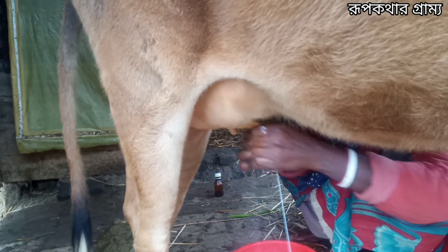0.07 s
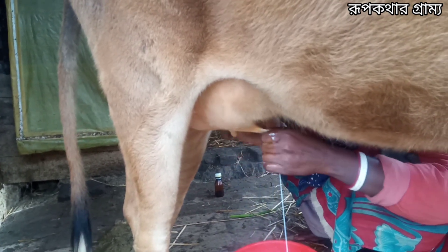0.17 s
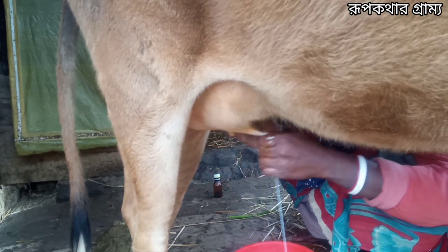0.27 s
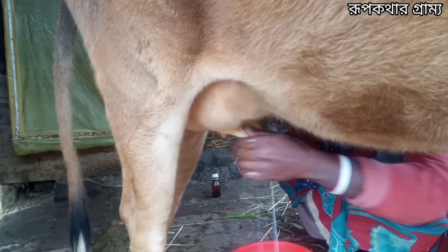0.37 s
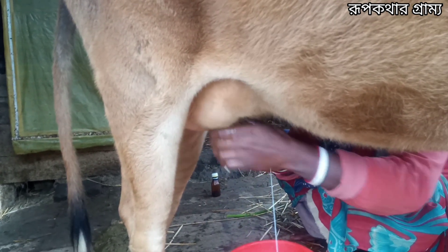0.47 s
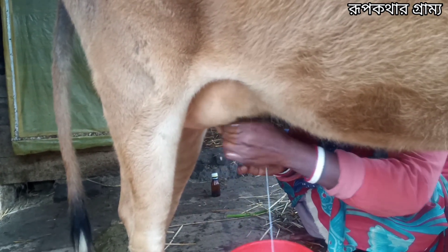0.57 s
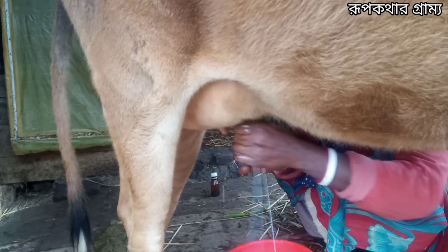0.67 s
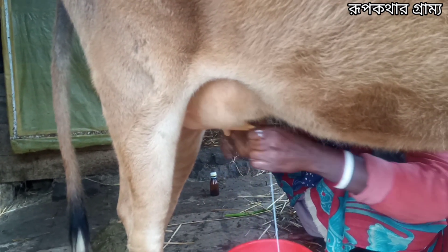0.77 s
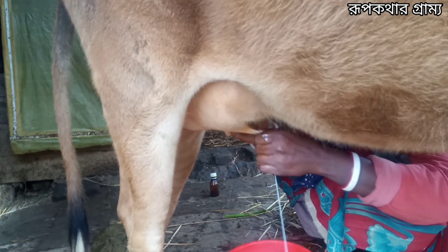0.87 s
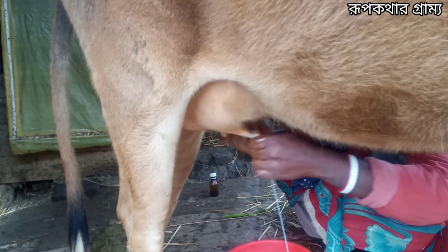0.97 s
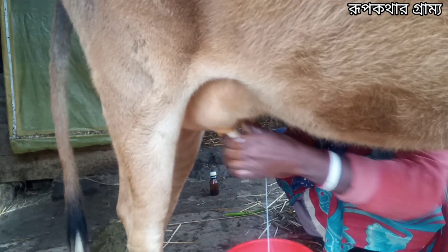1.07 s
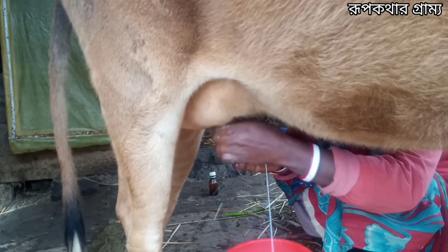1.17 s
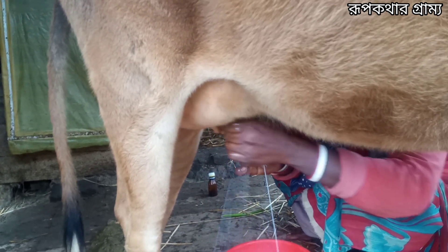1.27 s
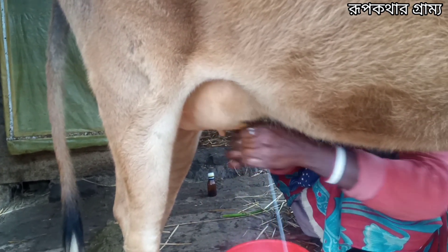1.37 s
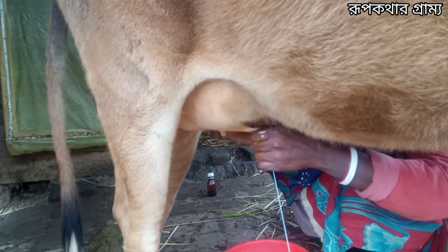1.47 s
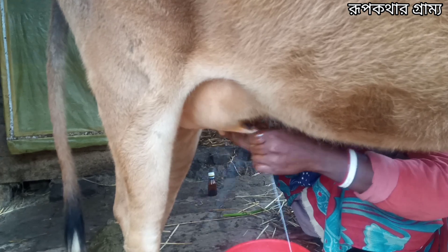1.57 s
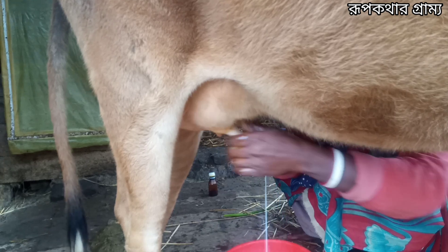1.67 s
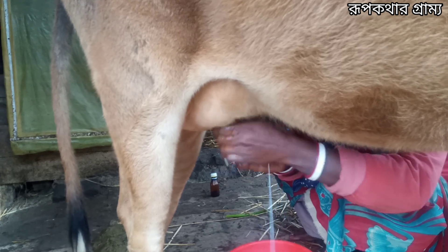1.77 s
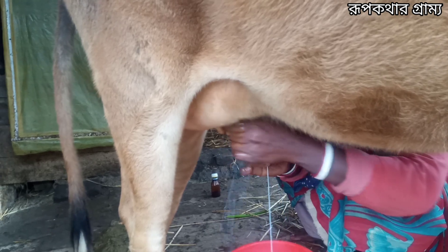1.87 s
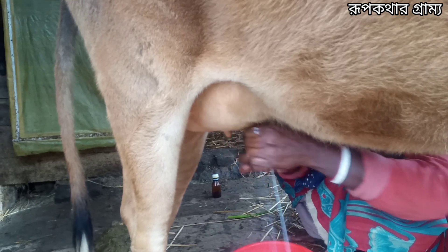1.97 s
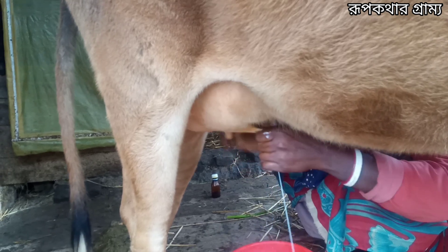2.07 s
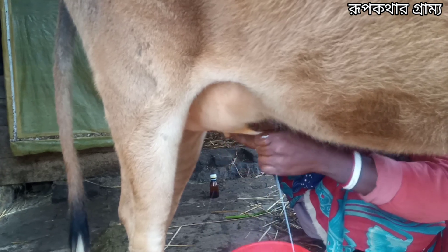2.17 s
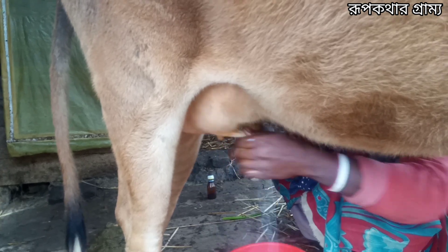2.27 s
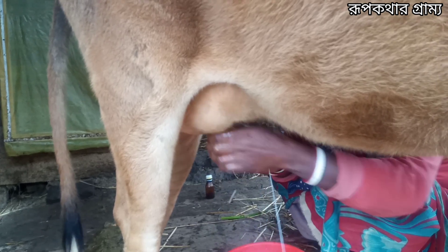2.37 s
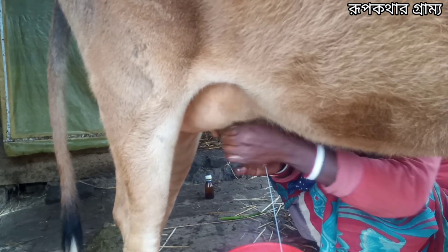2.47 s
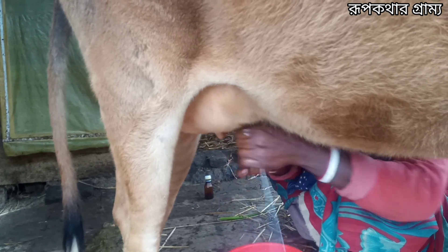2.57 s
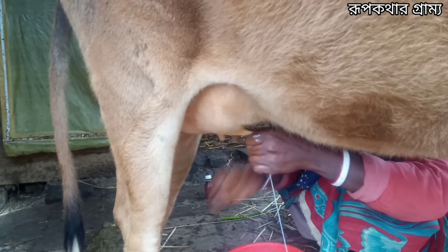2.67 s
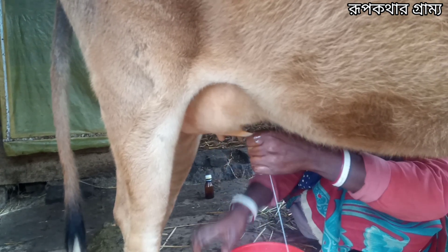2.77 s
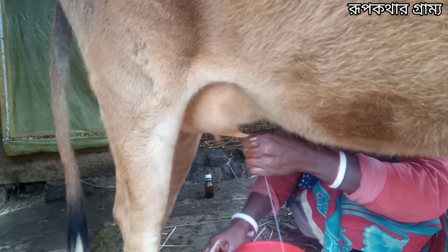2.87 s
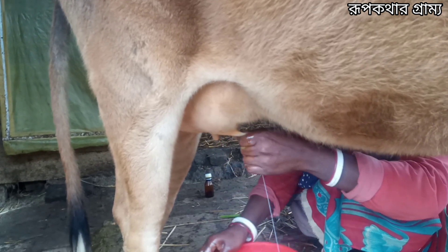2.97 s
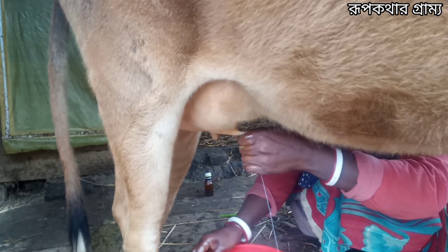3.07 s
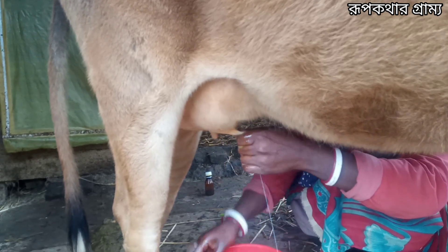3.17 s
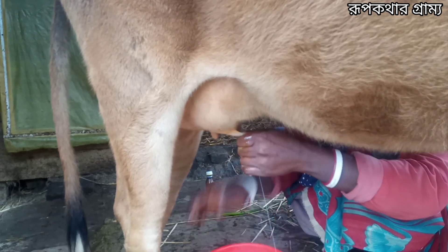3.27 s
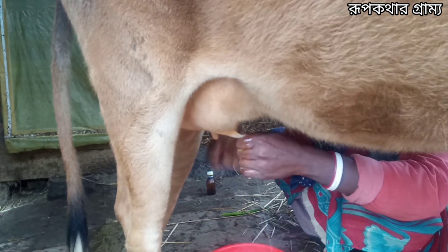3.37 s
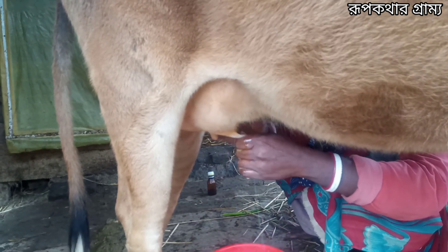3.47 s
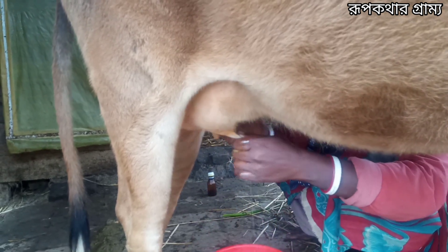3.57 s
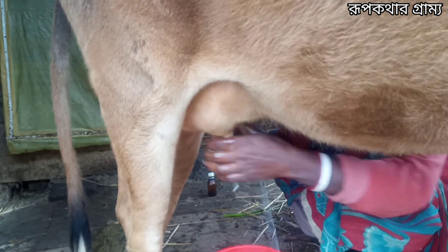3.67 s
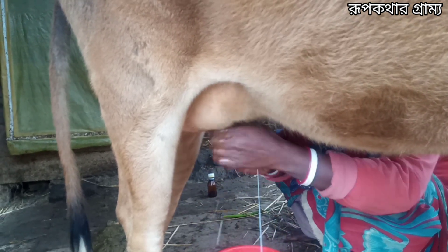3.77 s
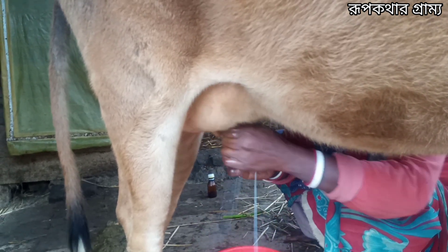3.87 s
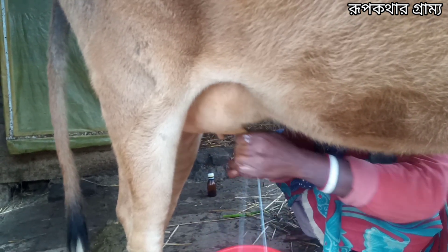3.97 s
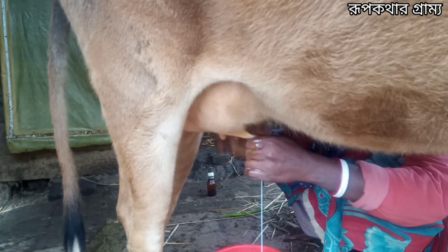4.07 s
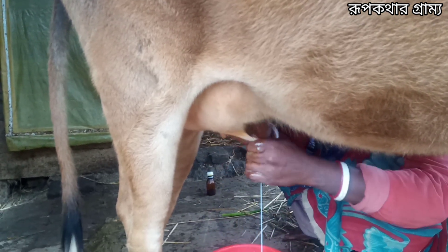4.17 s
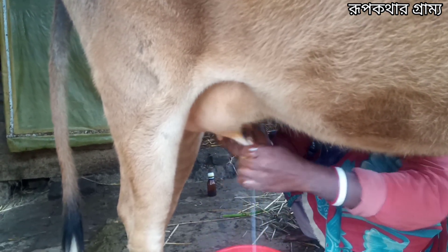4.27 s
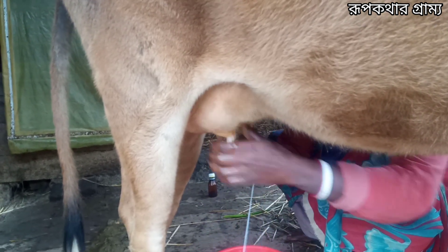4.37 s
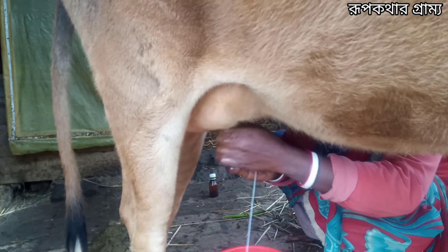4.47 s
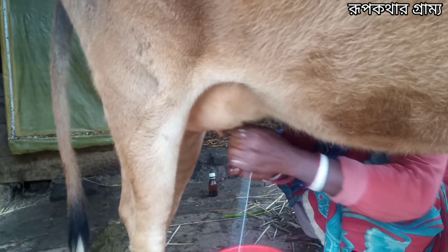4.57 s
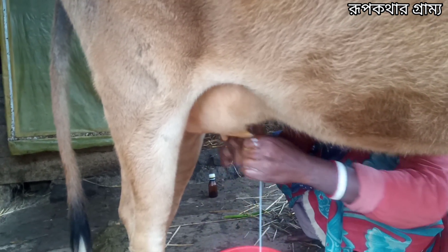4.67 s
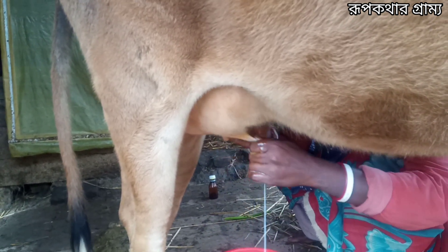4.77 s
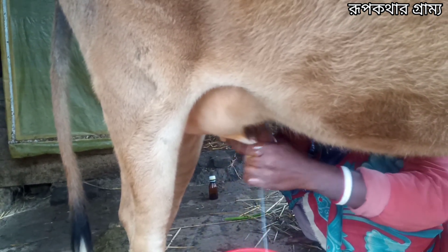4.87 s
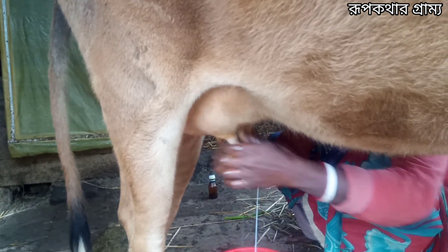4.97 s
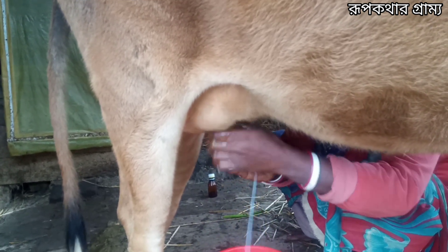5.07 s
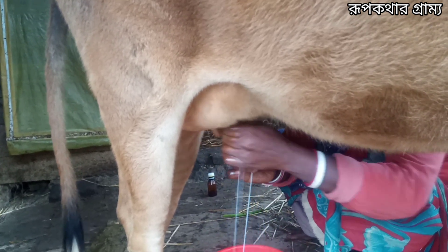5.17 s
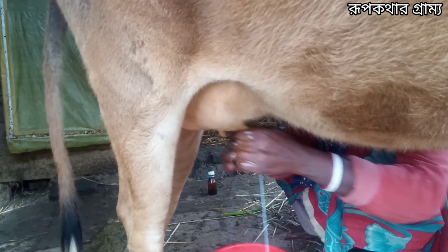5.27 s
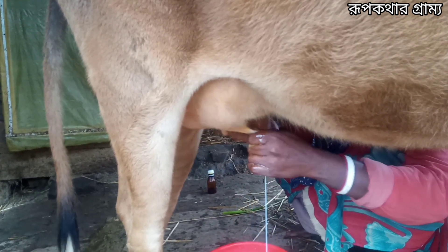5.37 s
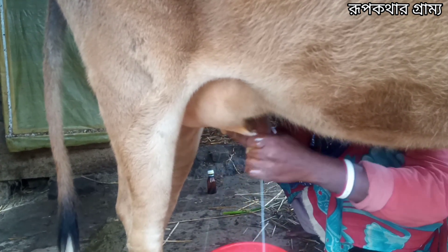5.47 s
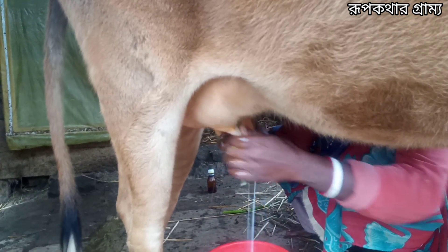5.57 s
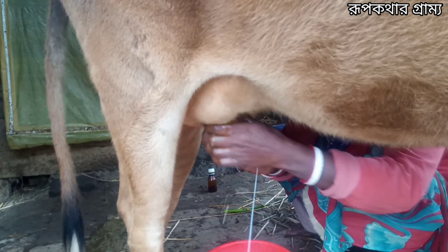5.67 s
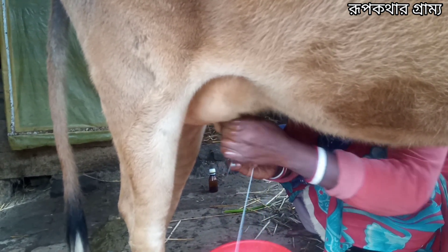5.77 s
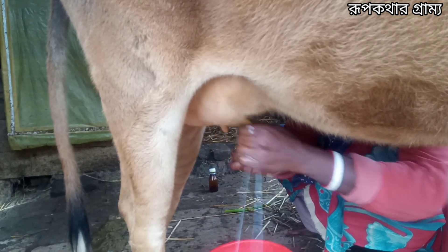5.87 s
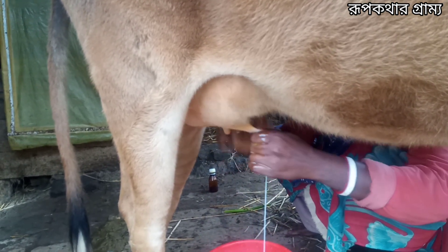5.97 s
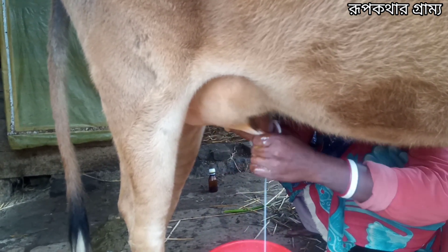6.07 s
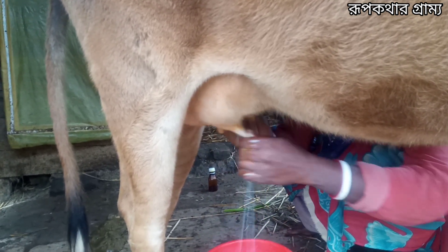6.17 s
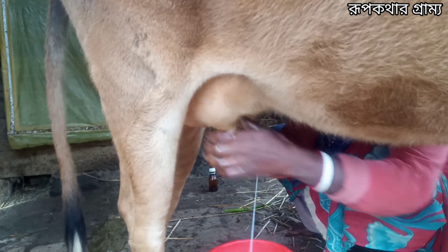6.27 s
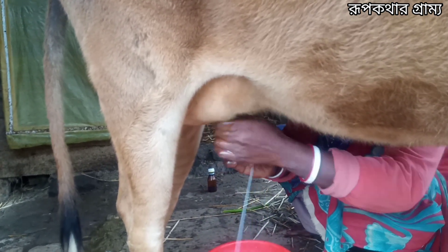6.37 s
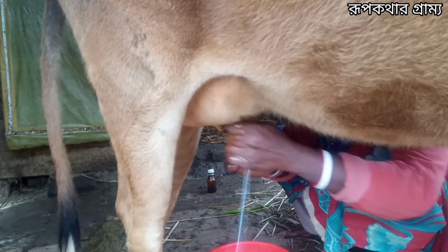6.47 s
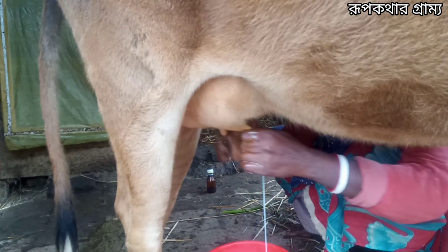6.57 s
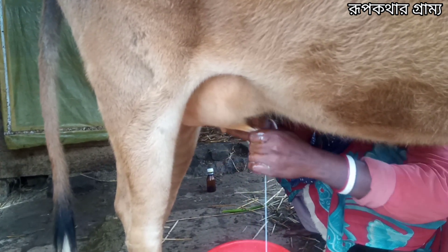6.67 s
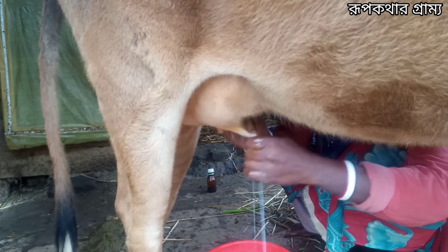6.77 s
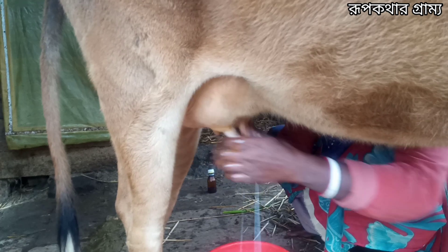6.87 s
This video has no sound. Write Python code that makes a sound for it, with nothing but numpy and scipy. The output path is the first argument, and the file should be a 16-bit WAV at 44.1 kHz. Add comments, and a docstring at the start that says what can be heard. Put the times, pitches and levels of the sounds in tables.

```python
"""Fizzing squirts of milk in a steady two-handed rhythm: a cow is milked outdoors into a plastic bucket.
Each jet tears the froth, drives bubbles under it and throws spray, and the bucket rings along.
Halfway, one hand shifts the bucket, which knocks twice; a few drops tick over a thin hiss
before the milking goes on. A soft scuff passes near the end, and a quiet yard lies underneath."""
import sys
import numpy as np
from scipy import signal
from scipy.fft import rfft, irfft, next_fast_len
from scipy.io import wavfile
from scipy.ndimage import uniform_filter1d, map_coordinates

SR = 44100
rng = np.random.default_rng(int(sys.argv[2]) if len(sys.argv) > 2 else 0)


def pcm_store(signal):
    """Save signal as 16-bit PCM."""
    levels = np.round(np.clip(np.atleast_2d(signal), -1, 1) * 32767)
    wavfile.write(sys.argv[1], SR, levels.astype(np.int16).T)


N = 305172

# One row a squeeze: (start [s], swell [s], length [s], hold [1 fades evenly, more holds longer],
# fizz [dB], plunge over fizz [dB], spray over fizz [dB], extra mist [dB], churn [dB],
# nominal crater pitch [Hz], plunge pitch [Hz])
SQUEEZES = [(-0.019, 0.0066, 0.18, 1.04, -26, 1, -31, 5, -42.5, 2500, 1200),
            (0.103, 0.074, 0.29, 2.97, -25.5, 1.0, -10.5, 3.5, -44.5, 2390, 1140),
            (0.453, 0.011, 0.305, 3.15, -23, -6.5, -15, 2, -40.5, 2600, 1400),
            (0.769, 0.054, 0.26, 2.33, -21.0, -1.0, -11.5, 0.0, -39.5, 2900, 1200),
            (1.105, 0.016, 0.26, 2.37, -19.5, -4.5, -15.5, 2, -39, 2660, 1230),
            (1.397, 0.097, 0.23, 4.6, -23, -5.5, -5.5, -1.5, -68, 2320, 1100),
            (1.745, 0.0036, 0.3, 1.9, -21, -4.5, -15, -0.5, -41.5, 2360, 1080),
            (2.03, 0.074, 0.23, 3.6, -24, -6.5, -8.0, 0.5, -71, 2980, 1050),
            (2.374, 0.0054, 0.24, 3.05, -27.5, 0, -9.5, 2, -44, 3040, 1140),
            (2.643, 0.021, 0.048, 4.1, -31, -3.0, -16, 6.5, -37.5, 3530, 1180),
            (2.733, 0.06, 0.15, 3.9, -30.5, -10, -12.5, -3, -50, 2100, 1350),
            (2.975, 0.005, 0.18, 2.6, -39, -10, -1, -2, -52.5, 2580, 1060),
            (3.777, 0.0042, 0.23, 9.5, -34.0, -0.5, -9.5, 2.0, -49, 2530, 1230),
            (4.03, 0.05, 0.31, 2.75, -27.0, -0.5, -12.5, -7, -41, 2910, 1250),
            (4.421, 0.054, 0.19, 2.23, -17, -9, -12, 3, -48, 3080, 1260),
            (4.701, 0.087, 0.22, 2.5, -18, -5.5, -15.5, -0.5, -45, 2630, 1260),
            (5.022, 0.016, 0.22, 1.5, -15.5, -6, -19.5, 6, -42.5, 2400, 1340),
            (5.313, 0.043, 0.26, 3.06, -25.5, -0.5, -8.0, -2, -41.5, 2260, 1210),
            (5.646, 0.21, 0.19, 4.5, -11.5, -9, -20, 3, -35, 2670, 1230),
            (5.976, 0.044, 0.23, 2.4, -19, -5, -22, -4, -46, 2530, 1240),
            (6.306, 0.011, 0.16, 5.8, -21, -9.5, -15, 4.5, -46.5, 2650, 1240),
            (6.596, 0.026, 0.26, 2.4, -21.5, -3.5, -13, -1.0, -44, 2900, 1200),
            (6.9, 0.016, 0.224, 2.6, -29.5, -0.5, -10.0, -6, -57, 3240, 1330)]
ATTACK_S = 0.0055  # how fast a jet lands


def milk():
    """The jet tears the foam, plunges under it and throws spray, sputtering as it breaks into beads."""
    *_, fizz_db, plunge_db, spray_db, mist_db, churn_db, crater_hz, plunge_hz = np.transpose(SQUEEZES)
    turn, progress = turns()
    sputter, surge = wander(per_s=150), wander(per_s=30)
    fizz_env = squeezing(fizz_db, follow=0.98, lead_s=0, dribble_db=-1.5)
    plunge_env = squeezing(fizz_db + plunge_db, follow=0.99, lead_s=0, dribble_db=-5)
    spray_env = squeezing(fizz_db + spray_db, follow=0.81, lead_s=0.015, dribble_db=-7)
    churn_env = squeezing(churn_db, follow=0.16, lead_s=0.022, dribble_db=-26)
    sag = 1.06 - 0.058 * progress  # the crater's pitch sinks as the jet weakens
    fizz = fizzing(fizz_env + 0.89 * sputter + 0.48 * surge, crater_hz[turn] * sag)
    plunge = plunging(plunge_env + 0.48 * sputter + 0.88 * surge, plunge_hz[turn])
    spray = spraying(spray_env + 1.64 * sputter + 2.4 * surge, mist_db[turn])
    return fizz + plunge + spray + churning(churn_env)


def turns():
    """Which squeeze is under way at each moment, and how far it has got (0-1)."""
    t = np.arange(N) / SR
    start, _, length, *_ = np.transpose(SQUEEZES)
    turn = np.searchsorted(start[1:] - ATTACK_S, t)
    return turn, np.clip((t - start[turn]) / length[turn], 0, 1)


def squeezing(levels_db, follow, lead_s, dribble_db, swell_db=12.5):
    """A jet layer's envelope in dB: it swells as the fist closes and follows the teat's emptying."""
    # Milk dribbling between squeezes, except while the bucket is shifted: (time [s], level [dB])
    dribble = [(0, -54), (1.1, -43), (1.7, -45.5), (2.7, -48.5), (3.1, -55.5), (3.2, -88), (3.75, -96),
               (3.8, -41.5), (5.3, -45.5), (5.9, -46), (6.9, -41.5)]
    t = np.arange(0, N, 32) / SR
    power = amp(np.interp(t, *np.transpose(dribble)) + dribble_db) ** 2
    for (start, swell, length, hold, *_), db in zip(SQUEEZES, levels_db):
        since = t - start + lead_s
        attack = np.exp(np.minimum(since, 0) / ATTACK_S)
        age = np.maximum(since, 0)
        emptied_db = follow * 21 * np.minimum(age / length, 6) ** hold
        power += (attack * amp(db - swell_db * np.exp(-age / swell) - emptied_db)) ** 2
    return np.interp(np.arange(N) / SR, t, 10 * np.log10(power))


def fizzing(level_db, crater_hz):
    """Small bubbles and droplets where the jet tears the foam; its crater resonates as it changes size."""
    # Tone of the torn foam: (frequency [Hz], level [dB])
    foam_eq = [(900, -27), (1500, -8), (2000, -4), (3200, 0), (3900, -1), (4600, -8), (5600, -11.5),
               (7200, -5.5), (8500, -17.5), (11000, -19.5)]
    foam = bubbles(1415, 9497, cycles=22.2, spread_db=3.5, rise=0.01, count=20000, size=500)
    foam += amp(-0.5) * splatter(per_s=7000, spread_db=3)
    foam = landing(colour(foam, foam_eq), t60=0.094, wet_db=-7.5)
    crater = resonate(foam, crater_hz * (1 + 0.07 * wander(per_s=24)), width_hz=500)
    foam = in_bucket(foam + amp(-4) * crater)
    foam = swirl(foam, depth_db=2.6, span_s=0.06, span_hz=520)
    return steadied(foam) * amp(level_db - 0.98)


def plunging(level_db, note_hz, thin_below_hz=950, thin_from_db=-31):
    """Larger bubbles driven under the foam ring the bucket's hollow note."""
    # Tone under the foam: (frequency [Hz], level [dB])
    plunge_eq = [(100, -55), (400, -59), (560, -21), (700, -12), (850, -18), (1050, -2), (1250, 0),
                 (1600, -4.5), (2100, -17), (3500, -33)]
    deep = bubbles(489, 2626, cycles=6.6, spread_db=2.5, rise=0.013, count=8000, size=800)
    deep = in_bucket(landing(colour(deep, plunge_eq), t60=0.12, wet_db=-5.5))
    deep += amp(-2) * resonate(deep, note_hz, width_hz=150)
    # a harder jet breaks up the big bubbles, thinning the low end
    big = signal.sosfiltfilt(signal.butter(4, thin_below_hz, fs=SR, output="sos"), deep)
    thinning_db = 0.46 * np.maximum(level_db - thin_from_db, 0)
    deep += big * (amp(-thinning_db) - 1)
    return steadied(deep) * amp(level_db - 0.6)


def spraying(level_db, mist_db, mist_above_hz=9500):
    """Droplets hit the wall in clumps, and the tiniest bubbles ping."""
    # Tone of the spray: (frequency [Hz], level [dB])
    spray_eq = [(200, -20), (1500, 8), (3500, 6), (5200, 6), (7200, 13), (9000, 2.5), (11000, -0.5),
                (15500, -0.5)]
    hits = splatter(per_s=6000, spread_db=3.6)
    pings = bubbles(5000, 16000, cycles=14, spread_db=4, rise=0.003, count=10000, size=400)
    spray = landing(colour(hits + amp(-2) * pings, spray_eq), t60=0.04, wet_db=-4)
    spray = swirl(spray, depth_db=2.2, span_s=0.04, span_hz=1100)
    mist = signal.sosfiltfilt(signal.butter(3, mist_above_hz, "high", fs=SR, output="sos"), spray)
    spray += (amp(mist_db) - 1) * mist
    clumps_db = 1.6 * wander(per_s=140)
    return steadied(spray) * amp(level_db + clumps_db + 1.02)


def churning(level_db):
    """Big slow bubbles stir the air in the bucket."""
    # Tone of the low gurgle: (frequency [Hz], level [dB])
    gurgle_eq = [(40, -16), (120, -3.5), (280, -10.5), (380, 2.5), (470, 5), (580, -3), (800, 1),
                 (1200, 4.5)]
    churn = bubbles(300.5, 907, cycles=8.3, spread_db=3, rise=0.011, count=1500, size=2200)
    churn += amp(-14) * rng.standard_normal(N)
    return unit(in_bucket(colour(churn, gurgle_eq))) * amp(level_db - 0.1)


def bubbles(low_hz, high_hz, cycles, spread_db, rise, count, size):
    """A swarm of bubbles at random moments: each rings down and rises in pitch as it surfaces."""
    when, pitch, strength, sign = rng.random((4, count, 1))
    hz = low_hz * (high_hz / low_hz) ** pitch
    age = np.arange(size) / SR * hz / cycles  # in decay times
    height = uneven(strength, sign, spread_db) * hz / low_hz
    rings = height * np.exp(-age) * np.sin(2 * np.pi * cycles * age * (1 + rise * age))
    at = (when * N).astype(int) + np.arange(size)
    return unit(np.bincount(at.ravel(), rings.ravel())[:N])


def splatter(per_s, spread_db):
    """Droplet impacts of unequal size."""
    chance, size, sign = rng.random((3, N))
    return unit((chance < per_s / SR) * uneven(size, sign, spread_db))


def swirl(x, depth_db, span_s, span_hz):
    """Pockets in the froth open and close, each favouring its own narrow band for a moment."""
    frames = dict(fs=SR, nperseg=512, noverlap=384)
    hz, t, spectrum = signal.stft(x, **frames)
    grid = np.meshgrid(hz / span_hz, t / span_s, indexing="ij")
    pockets = map_coordinates(rng.standard_normal((256, 512)), grid, order=3, mode="wrap")
    return signal.istft(spectrum * amp(depth_db * np.clip(pockets, -2, 2)), **frames)[1][:N]


def landing(x, t60, wet_db):
    """Each squeeze lands on another spot and so wakes its own set of narrow wall resonances."""
    out, t = np.zeros(N), np.arange(SR // 6) / SR
    turn, _ = turns()
    for k in np.unique(turn):
        walls = rng.standard_normal(len(t)) * amp(-60 * t / t60) * (t > 0.002)
        walls *= amp(wet_db) / np.linalg.norm(walls)
        walls[0] = 1  # the direct sound
        add(out, np.argmax(turn == k) / SR, signal.fftconvolve(x[turn == k], walls))
    return out


def in_bucket(x, moved_s=3.3):
    """The bucket's air rings along with the milk, in a new colour once the bucket is set down."""
    # Air and wall resonances: (pitch [Hz], width [Hz], gain before the move [dB], gain after it [dB])
    resonances = [(419, 66, 5.5, 2), (645, 420, 5, 8.5), (972, 46, 7.5, -14), (1188, 45, 3, -1.5),
                  (1490, 40, -2, -4.5), (2020, 270, 6, 5.5), (2386, 43, -10, 3), (3100, 660, -20.5, -12.5)]
    moved = np.arange(N) / SR > moved_s
    return x + sum(amp(np.where(moved, after_db, before_db)) * resonate(x, hz, width)
                   for hz, width, before_db, after_db in resonances)


def knocks(clack_decay_s=0.0013, clack_rise_s=0.00098):
    """The bucket is shifted: each blow rings its modes, and a hard contact adds a plastic clack."""
    # Blows on the bucket: (time [s], body [dB], contact time [s], clack [dB], clack pitch [Hz])
    blows = [(2.953, -23.5, 0.00041, -15, 2200), (2.9732, -2, .0014, -42, 900),
             (2.9806, -12.5, 0.00078, -17.5, 2240), (3.2348, -8.5, 0.00083, -23.5, 900)]
    # Modes of the filled bucket: (pitch [Hz], level [dB], t60 [s])
    modes = [(115, -27.5, 0.091), (205, -27, 0.12), (277, -25, 0.14), (355, -22.5, 0.35), (387, -9, 0.063),
             (401.3, -15.5, 0.27), (465, -31, 0.15), (593, -22.5, 0.1), (727, -24, 0.089),
             (980, -16.5, .08), (1210, -18, 0.16), (1650, -15, 0.056), (2020, -14, 0.061)]
    thuds, clacks, t = np.zeros(N), np.zeros(N), np.arange(SR // 2) / SR
    body = sum(amp(db - 60 * t / t60) * np.cos(2 * np.pi * hz * t) for hz, db, t60 in modes)
    clack_env = np.exp(-t / clack_decay_s) * (1 - np.exp(-t / clack_rise_s))
    for s, body_db, contact_s, clack_db, clack_hz in blows:
        push = t * np.exp(-4 * t / contact_s)
        add(thuds, s, amp(body_db) * signal.fftconvolve(body, push / push.sum())[:len(t)])
        crack = resonate(rng.standard_normal(len(t)), clack_hz, width_hz=900)
        band = signal.butter(2, [clack_hz / 4, min(clack_hz * 2.8, SR / 3)], "band", fs=SR)
        add(clacks, s, amp(clack_db + 7) * unit(signal.lfilter(*band, crack)) * clack_env)
    clacks = echoes(clacks, t60=0.09, wet_db=-5)
    # soft plastic rings with little treble, and so small a body radiates little bass
    thuds = signal.lfilter(*signal.butter(2, 2300, fs=SR), thuds)
    return signal.lfilter(*signal.butter(2, 150, "high", fs=SR), thuds + clacks)


def drops(decay_s=0.002, rise_s=0.00071, spit_lead_s=0.027):
    """Each drop bursts in a short bright tick of its own colour."""
    # Stray drops of milk: (time [s], level [dB])
    strays = [(0.127, -24), (0.4394, -23), (0.772, -25), (1.383, -34), (1.8607, -19), (2.6515, -25.5),
              (2.8797, -24.5), (3.393, -34), (3.493, -36.5), (3.572, -45), (3.617, -27), (3.793, -29),
              (4.1135, -19.5), (4.383, -20.5), (4.6997, -23.5), (5.0525, -30), (5.661, -20), (5.841, -23),
              (5.939, -25), (6.2594, -30), (6.5207, -22)]
    # Average tone of a tick: (frequency [Hz], level [dB])
    tick_eq = [(200, -24), (2000, -20), (4000, -8), (5000, -16), (7200, -1.5), (10000, -3.5), (12000, -7),
               (14000, -4.5), (16000, -11)]
    # each squeeze spits one drop just ahead of its jet
    spits = [(start - spit_lead_s, -31.5) for start, *_ in SQUEEZES[1:]]
    out, t = np.zeros(N), np.arange(1500) / SR
    envelope = np.exp(-t / decay_s) * (1 - np.exp(-t / rise_s))
    for s, db in list(strays) + spits:
        own_eq = np.array(tick_eq) + np.outer(rng.standard_normal(len(tick_eq)), [0, 3])
        tick = unit(colour(rng.standard_normal(len(t)), own_eq)) * envelope
        add(out, s, amp(db - 1) * tick)
    return echoes(out, t60=0.093, wet_db=-6)


def scuff():
    """A soft low scuff near the end."""
    # Path of the scuff: (time [s], level [dB], pitch [Hz])
    path = [(6.3, -58, 257), (6.4, -56, 192), (6.48, -46, 165), (6.55, -47, 226), (6.59, -44.5, 314),
            (6.65, -53, 227), (6.72, -74, 200)]
    return gliding_noise(path, width_hz=96, upper_ratio=1.51)


def thin_hiss():
    """A thin hiss flickers and rises in the pause."""
    # Path of the hiss: (time [s], relative level [dB], pitch [Hz])
    path = [(3.24, -56, 2510), (3.31, -51, 2680), (3.37, -55.5, 2740), (3.42, -51.5, 3100),
            (3.47, -80, 3340)]
    flicker_db = 3 * wander(per_s=35)
    return amp(flicker_db - 4.5) * gliding_noise(path, width_hz=610, upper_ratio=1.29)


def yard(level_db=-59):
    """A faint, steady bed of outdoor noise, strongest in the lows."""
    # Tone of the yard: (frequency [Hz], level [dB])
    yard_eq = [(18, -55), (30, -24), (62, -11.5), (199, -6.5), (328, -10), (666, -17.5), (1500, -19),
               (2830, -17.5), (4780, -28), (6900, -23), (14400, -35), (16000, -46)]
    return amp(level_db) * unit(colour(rng.standard_normal(N), yard_eq))


def gliding_noise(path, width_hz, upper_ratio, upper_db=1):
    """Noise in a pair of resonances that glide together."""
    s, db, hz = np.transpose(path)
    t = np.arange(N) / SR
    pitch, noise = np.interp(t, s, hz), rng.standard_normal(N)
    low, high = (unit(resonate(resonate(noise, f, width_hz), f, width_hz))
                 for f in (pitch, pitch * upper_ratio))
    envelope = amp(np.interp(t, s, db)) * (t > s[0]) * (t < s[-1])
    return unit(low + amp(upper_db) * high) * envelope


def echoes(x, t60, wet_db):
    """Adds a dense, quickly dying train of reflections."""
    t = np.arange(SR // 3) / SR
    tail = rng.standard_normal(len(t)) * amp(-60 * t / t60) * (t > 0.001)
    return x + amp(wet_db) * signal.fftconvolve(x, tail / np.linalg.norm(tail))[:N]


def colour(x, eq):
    """Filters by an EQ curve drawn on a log-frequency axis."""
    hz, db = np.transpose(eq)
    size = next_fast_len(len(x) + 512)
    bins = np.fft.rfftfreq(size, 1 / SR)
    gain = amp(np.interp(np.log(bins + 1), np.log(hz), db))
    return irfft(rfft(x, size) * gain, size)[:len(x)]


def resonate(x, hz, width_hz):
    """A resonance of gain 1 that can follow a pitch curve."""
    carrier = np.exp(2j * np.pi * np.cumsum(hz * np.ones(len(x))) / SR)
    pole = np.exp(-np.pi * width_hz / SR)
    return 2 * (carrier * signal.lfilter([1 - pole], [1, -pole], x / carrier)).real


def wander(per_s):
    """A random drift of rms 1 that changes about per_s times a second."""
    position = np.arange(N) * per_s / SR
    return unit(map_coordinates(rng.standard_normal(8192), [position], order=1, mode="wrap"))


def uneven(size, sign, spread_db):
    """Turns uniform draws into hits of either polarity, many weak and a few strong."""
    return amp(spread_db * np.minimum(-np.log(1 - size), 4)) * np.sign(sign - 0.5)


def steadied(x, size=700):
    """Evens out a texture's slow swings, so that its envelope alone sets the level."""
    return x / np.sqrt(abs(uniform_filter1d(x ** 2, size)) + 1e-12)


def amp(db):
    """Decibels to gain."""
    return 10 ** (np.asarray(db) / 20)


def unit(x):
    """Scales to rms 1."""
    return x / np.sqrt(np.mean(x ** 2) + 1e-20)


def add(mix, s, sound):
    """Mixes a sound in at time s."""
    part = mix[round(s * SR):][:len(sound)]
    part += sound[:len(part)]


def scene():
    """Milk and bucket close by, in a quiet yard with faint reflections."""
    faint = scuff() + thin_hiss()
    near = milk() + drops() + knocks() + faint
    return (echoes(near, t60=0.2, wet_db=-16) + yard())[None]


def record(dry, edge_hz=15800):
    """A steep low-pass trims the very top."""
    lowpass = signal.firwin(301, edge_hz, window=("kaiser", 8), fs=SR)
    return signal.oaconvolve(dry, lowpass[None], "same")


dry = scene()
out = record(dry)
pcm_store(out)
```